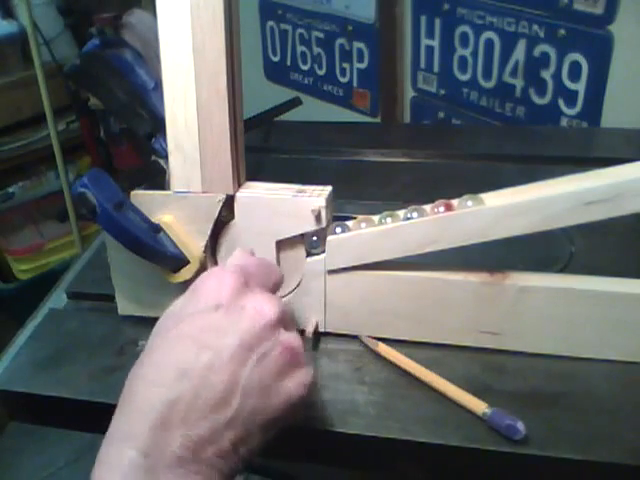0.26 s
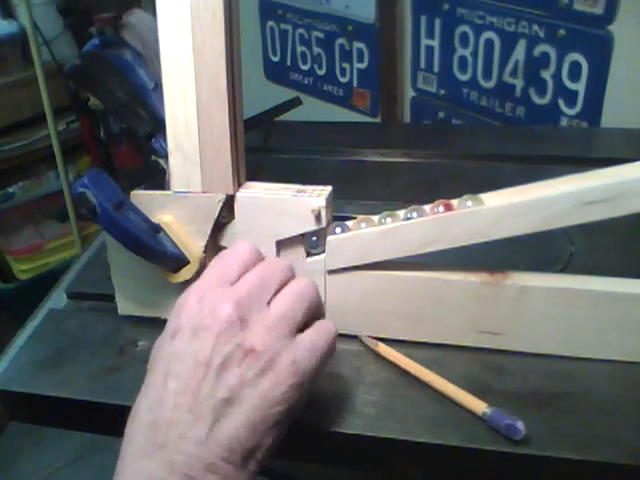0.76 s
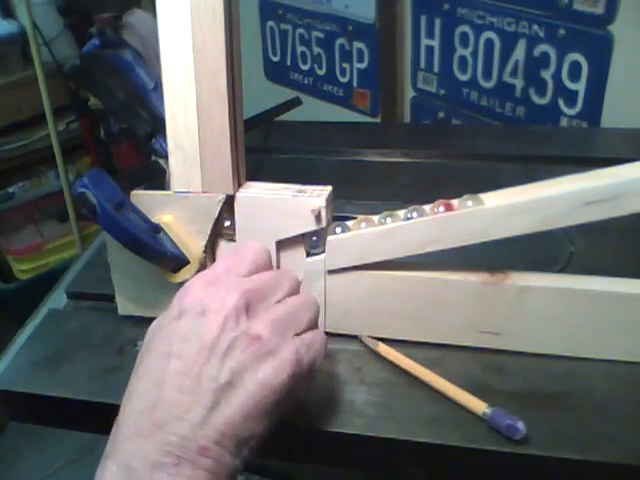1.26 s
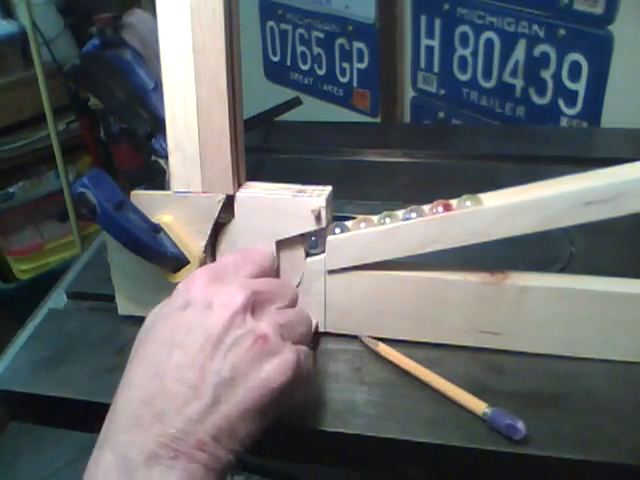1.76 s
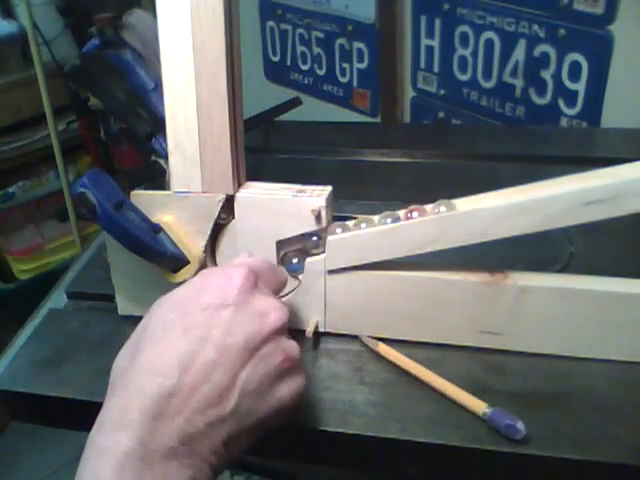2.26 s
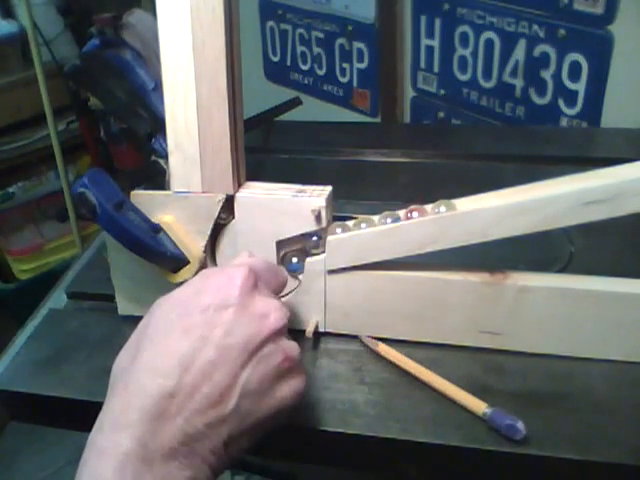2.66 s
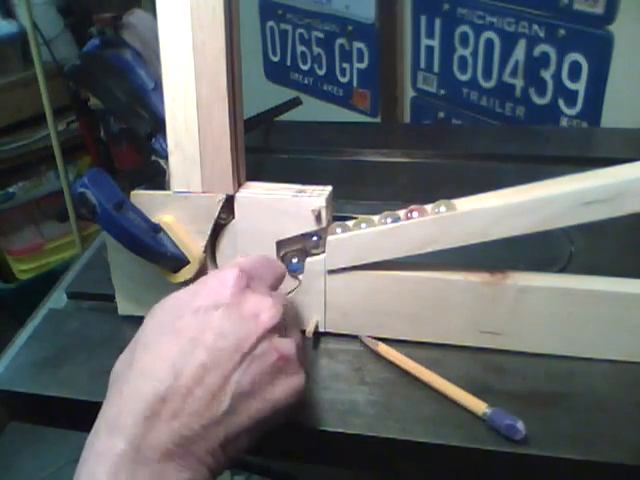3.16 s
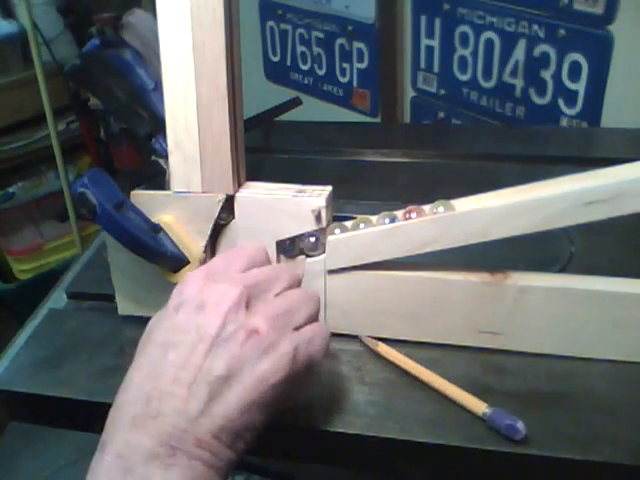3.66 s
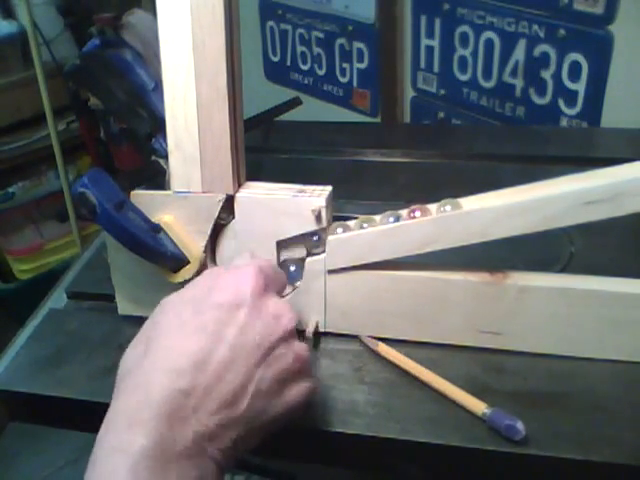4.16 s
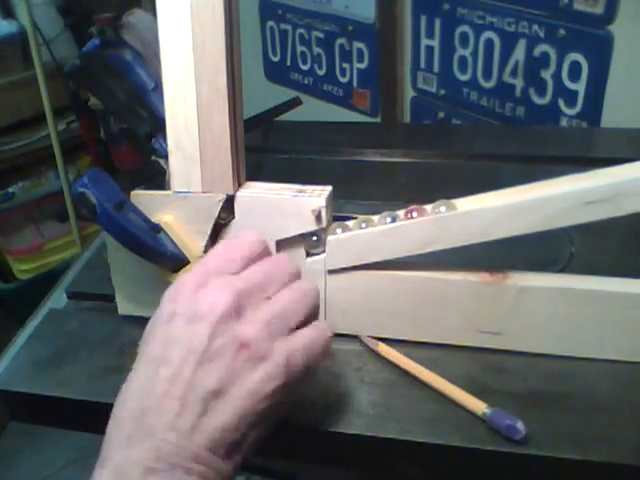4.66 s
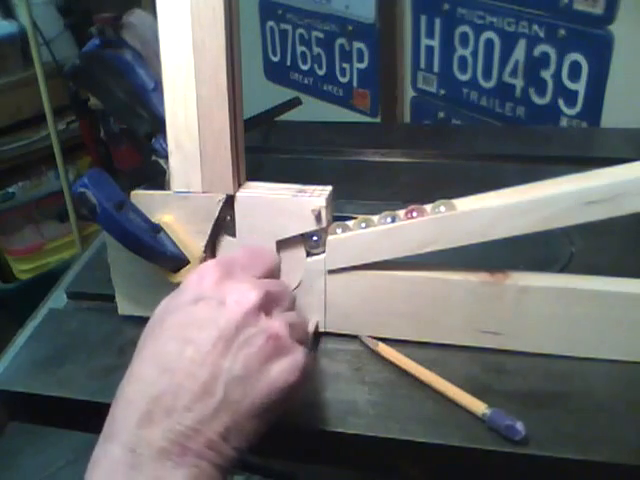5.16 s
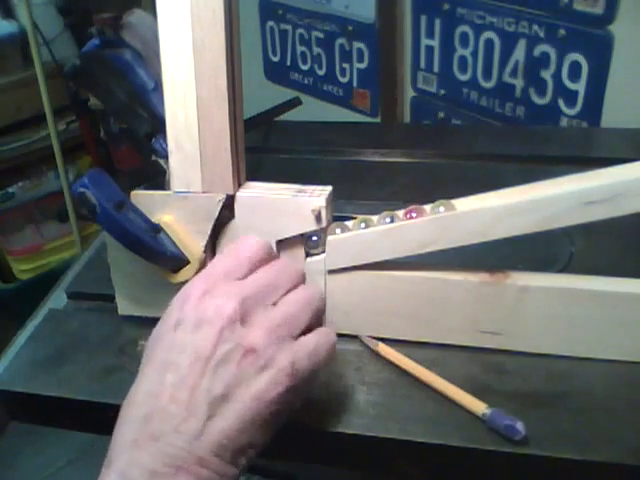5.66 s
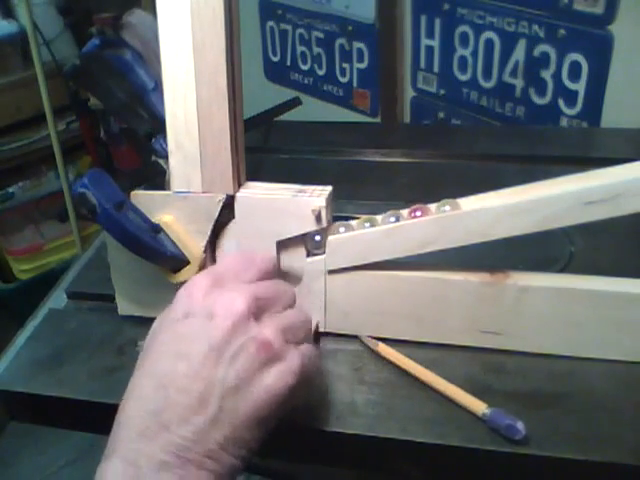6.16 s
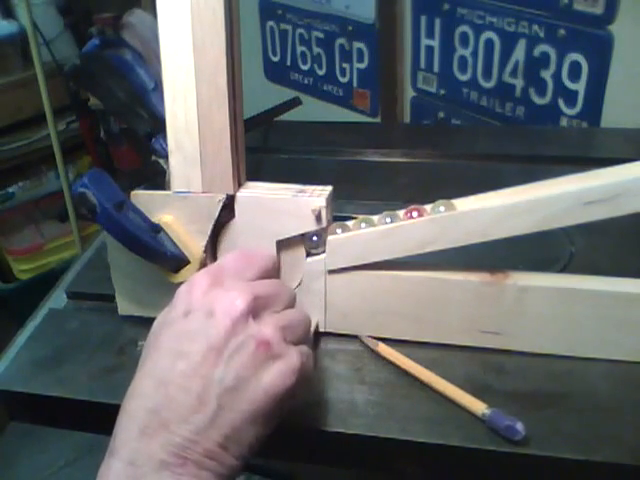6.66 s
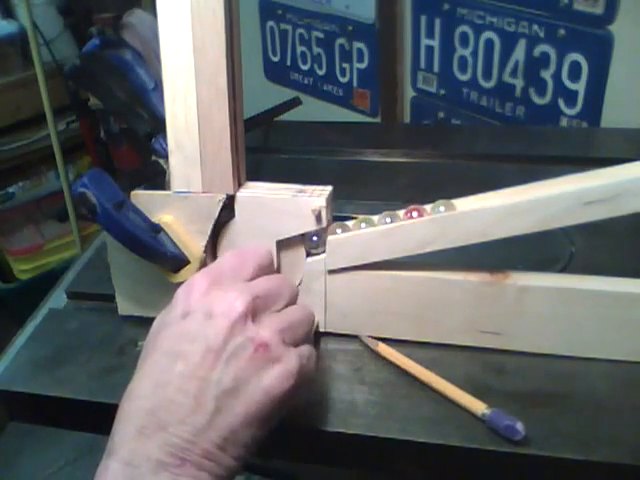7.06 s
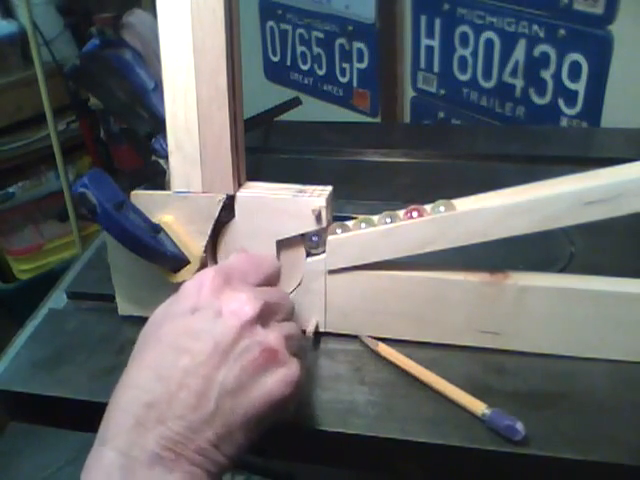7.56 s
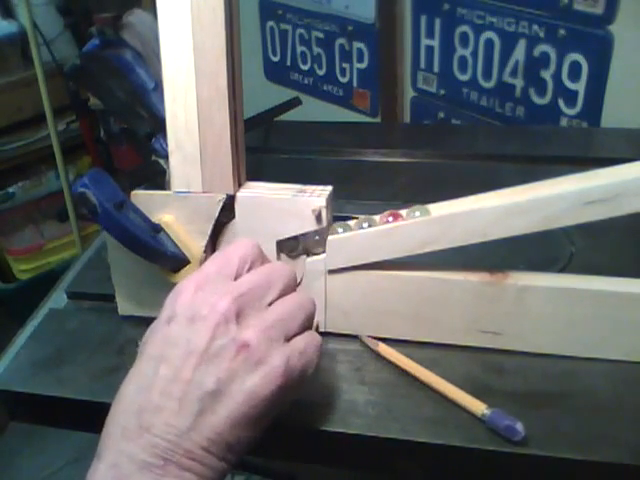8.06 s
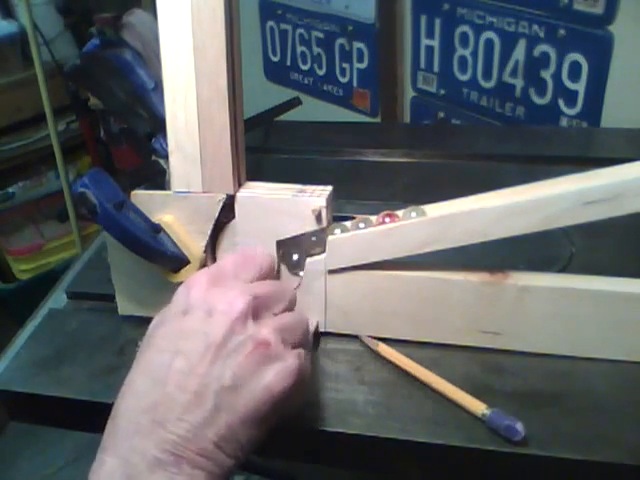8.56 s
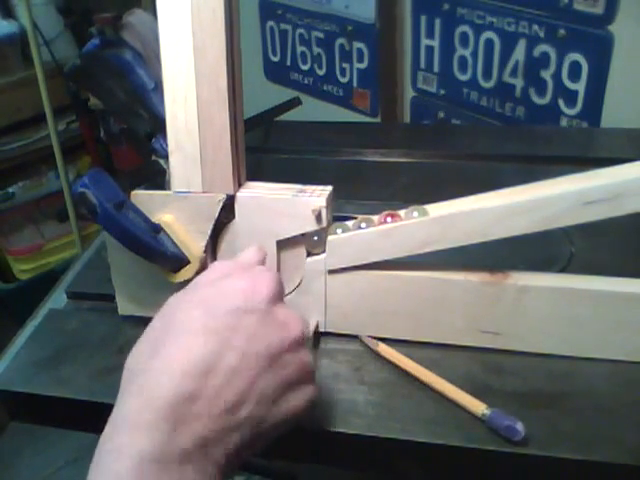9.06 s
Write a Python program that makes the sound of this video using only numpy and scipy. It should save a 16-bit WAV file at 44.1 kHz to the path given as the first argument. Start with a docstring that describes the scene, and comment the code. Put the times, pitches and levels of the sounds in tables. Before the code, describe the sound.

A hand slowly turns a small wooden marble lift close to the microphone. Marbles fall with hard woody knocks and short dull thumps, then bright glass clicks follow as the queue shifts. Soft rubbing surrounds some moves. The strongest knock comes past the middle, then activity thins to light taps. A quiet fan and steady hum fill the indoor workshop.

```python
"""Hand-cranked marble lift

A hand slowly cranks a small wooden marble lift on a workbench, close to a mono microphone.
Marbles drop, knock on the track and click together in the queue: noise pushes ringing wood and glass modes.
Drops add a bright crack and a dull thump; the wheel rubs in tiny random slips; two dry ticks are short sines.
Below lie shaped fan noise with hollow resonances, steady hum tones and a thin electric whine."""
import sys
import numpy as np
from scipy.fft import rfft, irfft, next_fast_len
from scipy.io import wavfile

SR = 44100
rng = np.random.default_rng(int(sys.argv[2]) if len(sys.argv) > 2 else 0)


def waveform_to_disk(signal):
    """Save audio, clipped to [-1, 1], as 16-bit WAV at the path in sys.argv[1]."""
    frames = np.transpose(np.atleast_2d(signal))
    scaled = np.clip(frames, -1, 1) * 32767
    samples = np.round(scaled).astype(np.int16)
    wavfile.write(sys.argv[1], SR, samples)


N = 411453

# resonances of the wooden frame: (centre [Hz], width [Hz], gain [dB])
FRAME_MODES = [(447, 100, -9.5), (727, 51, 3), (970, 210, -1), (1190, 190, 3), (1447, 240, -0.5)]
# resonances of the wooden track: (centre [Hz], width [Hz], gain [dB])
TRACK_MODES = [(1742, 300, -7.5), (1970, 155, 3.5), (2191, 114, 3), (2470, 250, 1), (2925, 89, 1.5),
               (3075, 390, -6)]
# resonances of a hard contact: (centre [Hz], width [Hz], gain [dB])
SNAP_MODES = [(3490, 320, -2), (3940, 460, -0.5), (4424, 126, 2.5), (4705, 153, 3.5), (5070, 740, -5)]
# resonances of the glass marbles: (centre [Hz], width [Hz], gain [dB])
GLASS_MODES = [(5650, 890, -2.5), (6870, 730, -3), (7560, 300, 0), (8270, 490, -0.5), (8520, 390, -1.5),
               (9320, 510, -3.5), (12200, 7700, -14), (14200, 2100, -16)]
# a marble falls and shakes the whole lift: (time [s], track knock [dB], then relative to the knock:
# frame thud [dB], hard snap [dB], glass click [dB], crack peak [dB]; pitch the struck spot favours [Hz])
MARBLE_DROPS = [(1.0245, -32.5, -7, -0.5, 5.5, 14, 7200), (1.5823, -27, -5.5, -7.5, -5.5, -5, 2020),
                (2.1175, -25, -10.5, -2.5, -2, 11.5, 2130), (3.2494, -40, 1.5, 0.5, 6.5, 19.5, 4700),
                (3.5452, -27.5, -11.5, -3.5, -22, -10, 2560), (4.8164, -23, -15, -6.5, -10.5, -13, 1880),
                (4.8504, -38, 4, 3, 2.5, 5, 1430), (4.875, -28.5, 1.5, 5.5, -6.5, 4, 1470),
                (4.914, -29, -3.5, -1.5, -15, 5, 2080), (5.0098, -24.5, -10.5, -0.5, 2.5, 7, 4600),
                (5.325, -30.5, -2, -5, -3, 0, 1920), (6.1436, -18.5, -9, -1, -4, 5, 2880),
                (7.815, -25, -12.5, -2.5, -19, -4, 2000)]


def amp(db):
    """Decibels to gain."""
    return 10 ** (np.asarray(db) / 20)


def unit(x):
    """x at rms 1."""
    return x / np.sqrt(np.mean(x ** 2) + 1e-20)


def along(points, hz):
    """Interpolate (Hz, value) points on a log frequency axis."""
    f, v = np.transpose(points)
    return np.interp(np.log(hz + 1), np.log(f + 1), v)


def filtered(x, response):
    """x times a response of frequency."""
    n = x.shape[-1]
    m = next_fast_len(n + 4096, True)
    spectrum = rfft(x, m) * response(np.fft.rfftfreq(m, 1 / SR))
    return irfft(spectrum, m)[..., :n]


def resonance(f, centre_hz, width_hz):
    """Band-pass response of one damped mode, 1 at its centre."""
    damping = 1j * f * width_hz
    return damping / (centre_hz ** 2 - f * f + damping)


def ring(x, modes):
    """x through the parallel modes of a part, neighbours in opposite sign."""
    def response(f):
        return sum((-1) ** k * amp(db) * resonance(f, centre_hz, width_hz)
                   for k, (centre_hz, width_hz, db) in enumerate(modes))
    return filtered(x, response)


def add(track, s, sound):
    """Mix a sound into the track at time s."""
    part = track[max(round(s * SR), 0):][:len(sound)]
    part += sound[:len(part)]


def swell(t, middle_s, length_s):
    """Bell-shaped envelope, down to exp(-2) one length from its middle."""
    return np.exp(-2 * ((t - middle_s) / length_s) ** 2)


def blows(modes, spot_hz, force_db, ring_scale, direct, box_t60, bench_db, bench_t60, room_db, room_t60,
          favour=1.43, favour_width=0.13, echoes_per_s=14000, dryness_db_per_db=0.16, heavy_db=-18):
    """One fresh blow per contact, at rms 1 over 7 ms: a tap and its scattered echoes drive the modes."""
    t = np.arange(SR // 4) / SR
    # scatter in the wooden box, then over the bench, then the room; t60 in s, box and bench times ring_scale
    box = amp(-60 * t / (box_t60 * ring_scale))
    bench = amp(bench_db - 60 * t / (bench_t60 * ring_scale))
    room = amp(room_db - 60 * t / room_t60)
    shape = (len(force_db), len(t))
    echoes = rng.standard_normal(shape) * (rng.random(shape) < echoes_per_s / SR)
    push = unit(echoes) * (box + bench + room)
    # a light touch is mostly its first tap; a heavy blow sets the whole lift rattling
    push[:, 0] += direct * amp(dryness_db_per_db * (heavy_db - force_db))
    # modes that move most at the struck spot ring strongest
    spot_hz = np.reshape(spot_hz, (-1, 1))
    push = filtered(push, lambda f: 1 + favour * resonance(f, spot_hz, favour_width * spot_hz))
    sound = ring(push, modes)
    head = sound[:, :round(.007 * SR)]
    return sound / np.sqrt(np.mean(head ** 2, axis=1, keepdims=True))


def contacts(s, knock_db, thud_db, snap_db, click_db, spot_hz, ring_scale):
    """Each contact rings track, frame, hard surface and glass, each at its own level."""
    how = spot_hz, np.maximum(knock_db, click_db), ring_scale
    track = blows(TRACK_MODES, *how, direct=7.3, box_t60=0.019, bench_db=-3.0, bench_t60=0.11,
                  room_db=-51, room_t60=0.45)
    frame = blows(FRAME_MODES, *how, direct=10, box_t60=0.046, bench_db=-7.0, bench_t60=0.14,
                  room_db=-38, room_t60=0.4)
    snap = blows(SNAP_MODES, *how, direct=16.3, box_t60=0.022, bench_db=-4.5, bench_t60=0.11,
                 room_db=-46, room_t60=0.35)
    glass = blows(GLASS_MODES, *how, direct=5.3, box_t60=0.022, bench_db=-8.5, bench_t60=0.11,
                  room_db=-49, room_t60=0.35)
    parts = [(knock_db, track), (thud_db, frame), (snap_db, snap), (click_db, glass)]
    hits = sum(amp(db)[:, None] * part for db, part in parts)
    out = np.zeros(N)
    for start, hit in zip(s, hits):
        add(out, start, hit)
    return out


def workshop(air_rms_db=-48.5):
    """Fan noise and the hollow resonances it excites, under steady, partly beating tones."""
    # fan noise spectrum, shape only: (frequency [Hz], relative density [dB])
    fan_spectrum = [(25, -24), (38, -14), (55, -11), (92, -15.5), (170, -4), (275, -9), (380, -14),
                    (460, -5), (600, -9.5), (790, -3), (865, -8.5), (925, -10), (1100, -13), (1500, -16.5),
                    (3000, -26.5), (15500, -31)]
    # resonances that the moving air excites: (centre [Hz], width [Hz], rms level [dB])
    hollow_bands = [(60.7, 10.4, -65.5), (177.6, 8.2, -61), (326.4, 24.6, -60.5), (467, 55, -65),
                    (965.4, 35, -54.5), (1363, 32, -66), (1612, 12, -71)]
    # motor and mains tones and the electric whine: (frequency [Hz], rms level [dB])
    hum_tones = [(118, -73), (161.3, -59), (198.6, -64.5), (206.2, -55.5), (240, -54.5), (243.8, -68.5),
                 (480, -70), (536.5, -65.5), (825.5, -72), (12805, -71), (12835, -81)]
    # a low hum swells briefly: (middle [s], length [s], frequency [Hz], rms level at the middle [dB])
    drone_swell = (8.5, 0.56, 111.5, -58.5)
    t = np.arange(N) / SR

    def band(hz, width_hz):
        noise = rng.standard_normal(N)
        return unit(filtered(noise, lambda f: 1 / (1 + 2 * ((f - hz) / width_hz) ** 2)))

    def tone(hz, phase_cycles=0):
        return np.sqrt(2) * np.sin(2 * np.pi * (hz * t + phase_cycles))

    fan = filtered(rng.standard_normal(N), lambda f: amp(along(fan_spectrum, f)))
    air = amp(air_rms_db) * unit(fan)
    hollows = sum(amp(db) * band(hz, width_hz) for hz, width_hz, db in hollow_bands)
    hum = sum(amp(db) * tone(hz, rng.random()) for hz, db in hum_tones)
    middle_s, length_s, hz, db = drone_swell
    drone = amp(db) * swell(t, middle_s, length_s) * tone(hz)
    return air + hollows + hum + drone


def clicks(spot_hz=8000, thud_db=-4, snap_db=-6.5, snap_from_wood=0.28, ring_scale=0.89):
    """Glass on glass is short and bright; the snap level also follows the wood's answer."""
    # one marble meets the next in the queue: (time [s], click [dB], track's answer re click [dB])
    queue_clicks = [(0.0548, -40, -16), (2.044, -35, -14), (2.087, -31, -22), (2.115, -29.5, 0.5),
                    (2.1225, -26, -11), (3.26, -35, -9), (4.0719, -33, -4.5), (4.1885, -46, -3),
                    (4.2091, -51, -11), (4.2298, -39.5, -10.5), (4.276, -39.5, -5.5), (4.836, -43, 3),
                    (4.8693, -42, 3), (5.0312, -38, -15), (5.298, -41, -1), (5.3162, -40, -6),
                    (6.273, -42, -8), (6.2945, -36.5, -5), (6.3025, -33, -6), (7.6945, -45.5, 2),
                    (7.906, -37.5, -5), (7.9438, -33.5, -13), (7.947, -38, -5), (7.9543, -30, -10.5),
                    (8.4444, -46, -15), (8.6615, -52, -13), (8.6841, -44.5, -15), (8.7203, -38.5, -6)]
    s, click_db, wood_db = np.transpose(queue_clicks)
    track_db = click_db + wood_db
    hard_db = click_db + snap_db + snap_from_wood * wood_db
    return contacts(s, track_db, track_db + thud_db, hard_db, click_db, spot_hz, ring_scale)


def wheel(slips_per_s=2000):
    """Wood grain catches in many tiny slips that sound mainly through frame and track."""
    # the wheel or a rolling marble rubs on the wood: (middle [s], length [s], level at the middle [dB])
    rub_swells = [(0.26, 0.17, -55.5), (1.12, 0.045, -60), (1.508, 0.073, -51.5), (2.015, 0.21, -53),
                  (4.08, 0.15, -55.5), (4.96, 0.19, -51), (5.292, 0.094, -48.5), (6.176, 0.089, -42.5),
                  (7.676, 0.063, -48.5), (7.895, 0.072, -54.5)]
    t = np.arange(N) / SR
    pressure = sum(amp(db) * swell(t, s, length_s) for s, length_s, db in rub_swells)
    slips = rng.standard_normal(N) * (rng.random(N) < slips_per_s / SR)
    voice = unit(ring(slips, TRACK_MODES))
    voice += amp(3.5) * unit(ring(slips, FRAME_MODES))
    voice += amp(-8) * unit(ring(slips, SNAP_MODES))
    voice += amp(-8) * unit(ring(slips, GLASS_MODES))
    return pressure * unit(voice)


def knocks(thud_db=-3, thud_db_per_octave=11, middle_hz=2000, glass_db=-10, ring_scale=0.91):
    """Lower spots bring more frame thud; snap and glass sound only as far as the contact is hard."""
    # a marble nudges the track: (time [s], knock [dB], snap re knock [dB], pitch the spot favours [Hz])
    track_knocks = [(0.2303, -44, -16, 1900), (1.0831, -41, -18, 1840), (1.1576, -44.5, -25, 1380),
                    (1.4867, -46, -10, 2300), (2.033, -43, -8, 1950), (4.0526, -39.5, -10, 2120),
                    (4.091, -40.5, -13, 2700), (4.1428, -36, -8, 2600), (4.4326, -44, -12, 2400),
                    (5.0528, -37, -20, 1850), (5.2095, -48, -18, 890), (5.2545, -44, -25, 1400),
                    (5.279, -44.5, -17, 1950), (6.2404, -38, -25, 2050), (7.8596, -40, -4, 2050),
                    (7.8879, -35.5, -15, 2170), (8.4299, -42.5, -21, 2100), (8.5274, -41, -2.5, 1950),
                    (8.6252, -39, -10, 2350), (8.7461, -41, -14, 2060), (8.8958, -49, -20, 1850)]
    s, knock_db, hardness_db, spot_hz = np.transpose(track_knocks)
    frame_db = knock_db + thud_db + thud_db_per_octave * np.log2(middle_hz / spot_hz)
    snap_db = knock_db + hardness_db
    return contacts(s, knock_db, frame_db, snap_db, snap_db + glass_db, spot_hz, ring_scale)


def drops(ring_scale=0.88, growth_per_db=0.004, usual_db=-26):
    """A falling marble sounds every part of the lift at once; heavier falls rattle on for longer."""
    s, db, thud_db, snap_db, click_db, _, spot_hz = np.transpose(MARBLE_DROPS)
    rattle = ring_scale * np.exp(growth_per_db * (db - usual_db))
    return contacts(s, db, db + thud_db, db + snap_db, db + click_db, spot_hz, rattle[:, None])


def thumps(t60_s=0.073, heaviest_peak_db=-27, growth_db_per_db=1.56):
    """A dull, short shudder of the base board; its level falls faster than that of the knock."""
    # the base board under the lift: (centre [Hz], width [Hz], gain [dB])
    base_modes = [(356, 230, -7.5), (490, 46, 7), (740, 110, 6)]
    out, t = np.zeros(N), np.arange(SR // 8) / SR
    top_db = max(row[1] for row in MARBLE_DROPS)
    for s, db, *_ in MARBLE_DROPS:
        burst = rng.standard_normal(len(t)) * amp(-60 * t / t60_s)
        thump = ring(burst, base_modes)
        peak_db = heaviest_peak_db + growth_db_per_db * (db - top_db)
        add(out, s, amp(peak_db) * thump / np.abs(thump).max())
    return out


def cracks(centre_hz=7500, width_hz=8000, t60_s=0.0036, delay_s=0.0003):
    """A marble stopped dead radiates a very short, bright pulse."""
    out, t = np.zeros(N), np.arange(SR // 100) / SR
    for s, db, *_, crack_db, _ in MARBLE_DROPS:
        burst = rng.standard_normal(len(t)) * amp(-60 * t / t60_s)
        crack = ring(burst, [(centre_hz, width_hz, 0)])
        add(out, s + delay_s, amp(db + crack_db) * crack / np.abs(crack).max())
    return out


def ticks(hz=3550, crest_s=0.00062):
    """A few quick cycles under a bell envelope, with no ring after them."""
    # two tiny dry ticks: (time [s], envelope peak [dB])
    dry_ticks = [(2.364, -32.5), (9.0714, -32.5)]
    out, t = np.zeros(N), np.arange(SR // 100) / SR
    tick = np.sin(2 * np.pi * hz * t) * np.exp(-3 * (t / crest_s - 1) ** 2)
    for s, db in dry_ticks:
        add(out, s, amp(db) * tick)
    return out


def scene():
    """Both channels carry the same microphone."""
    marbles = clicks() + knocks() + drops() + thumps() + cracks()
    mono = workshop() + marbles + wheel() + ticks()
    return np.array([mono, mono])


def record(dry, top_hz=15900, slope_hz=200):
    """Low-pass with a narrow linear slope centred on the band limit."""
    return filtered(dry, lambda f: np.clip((top_hz - f) / slope_hz + 0.5, 0, 1))


dry = scene()
out = record(dry)
waveform_to_disk(out)
```